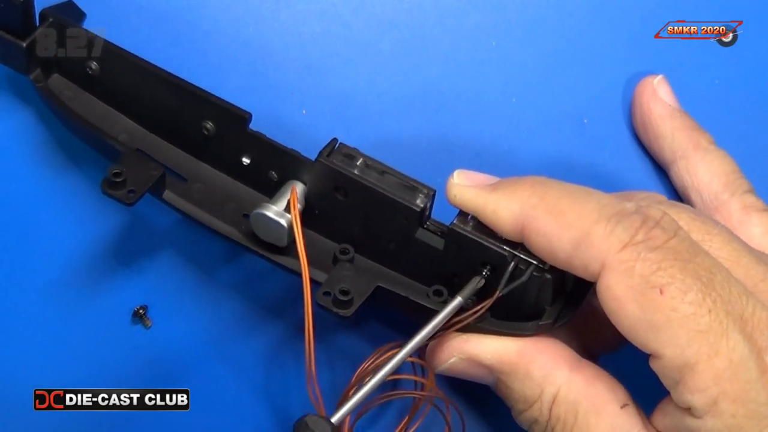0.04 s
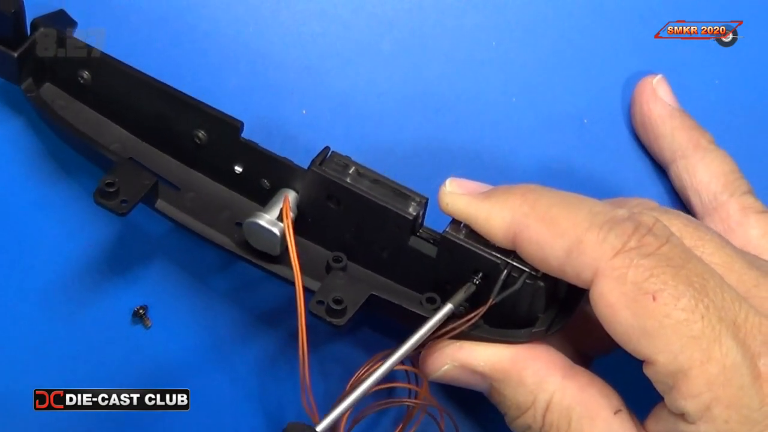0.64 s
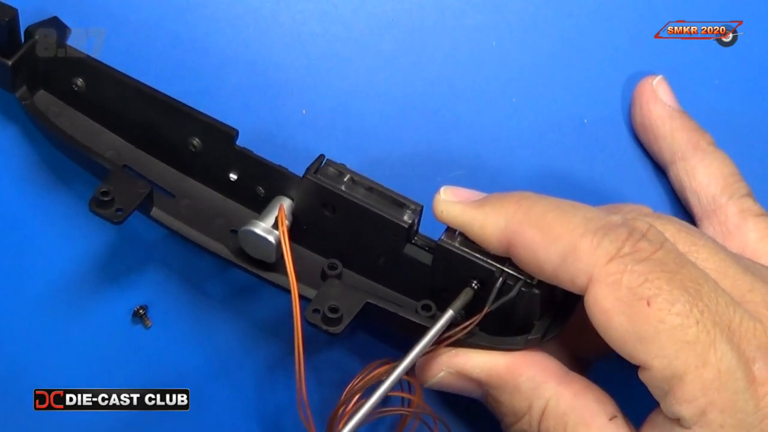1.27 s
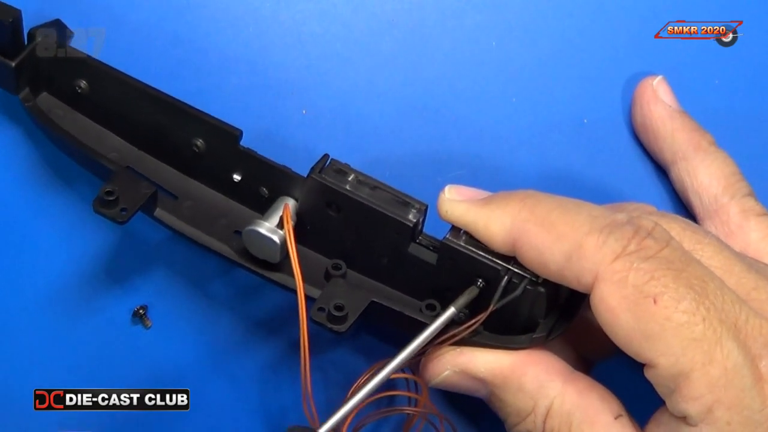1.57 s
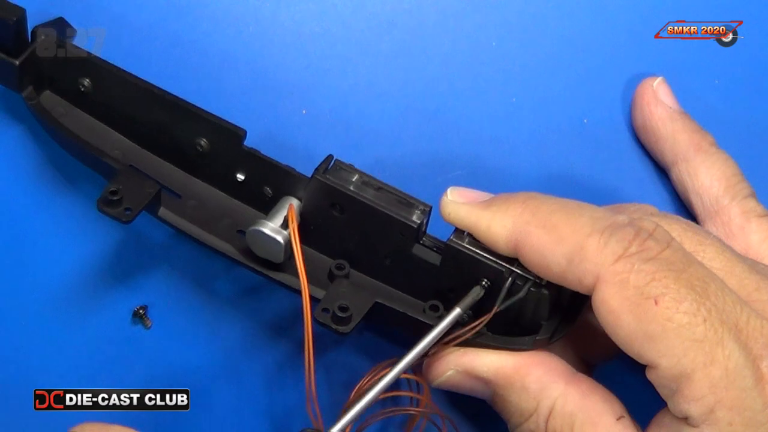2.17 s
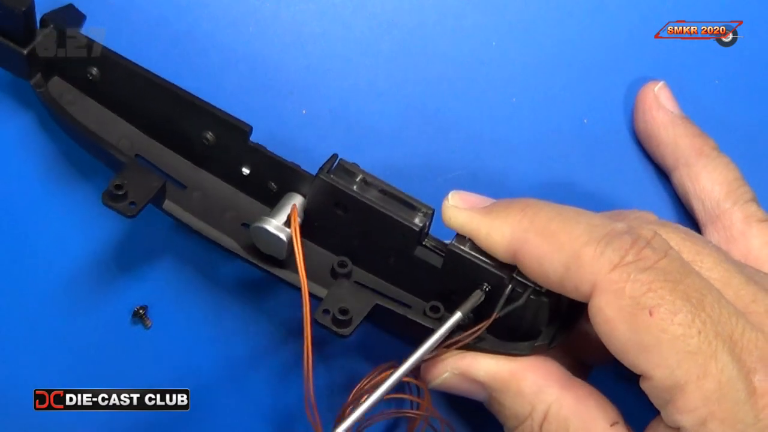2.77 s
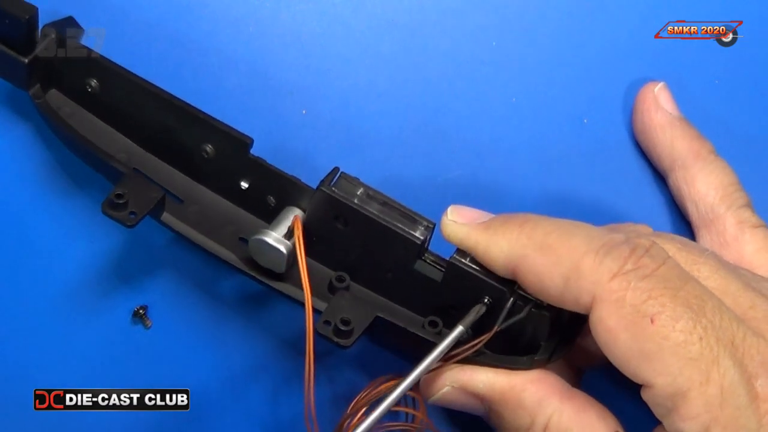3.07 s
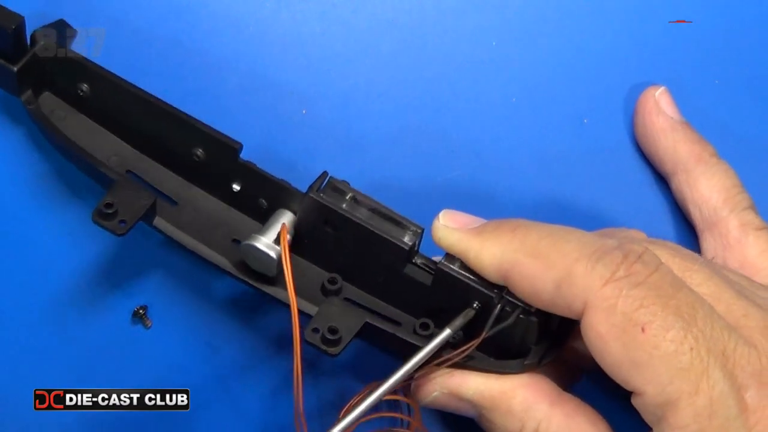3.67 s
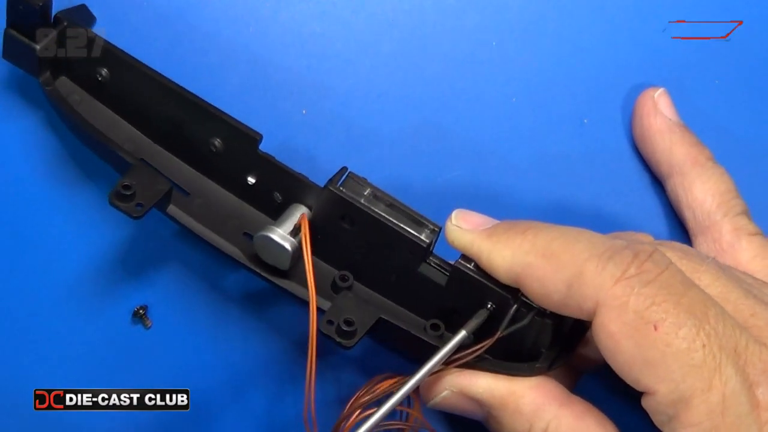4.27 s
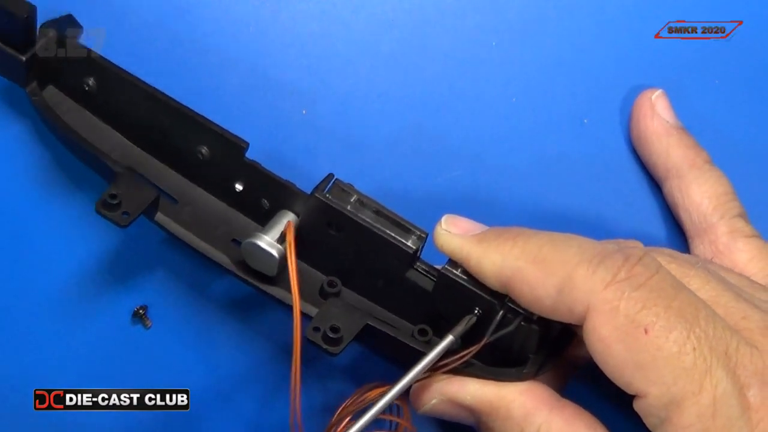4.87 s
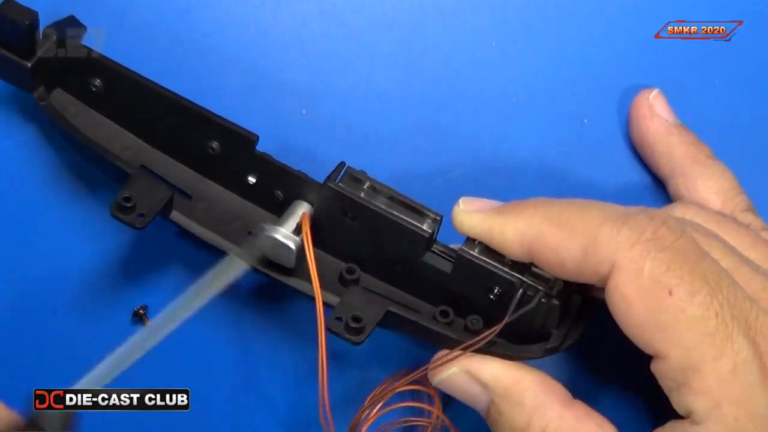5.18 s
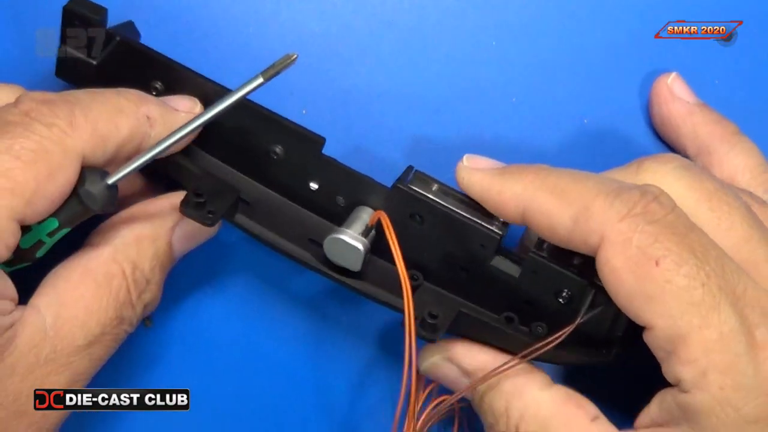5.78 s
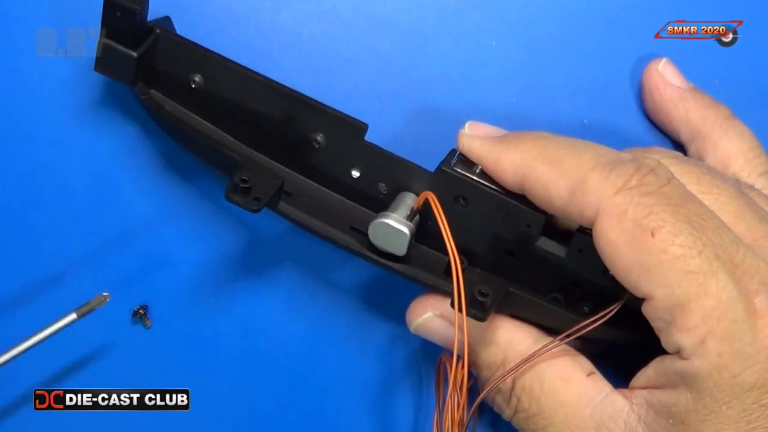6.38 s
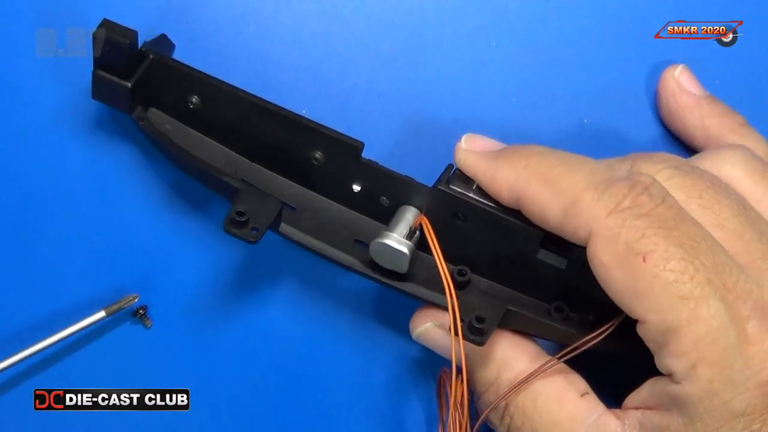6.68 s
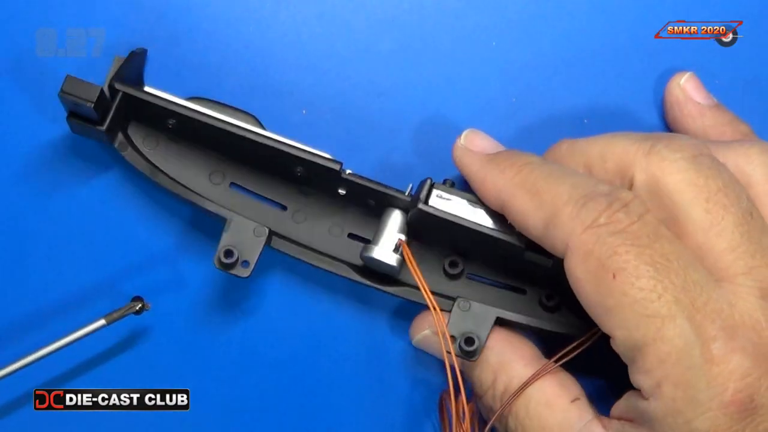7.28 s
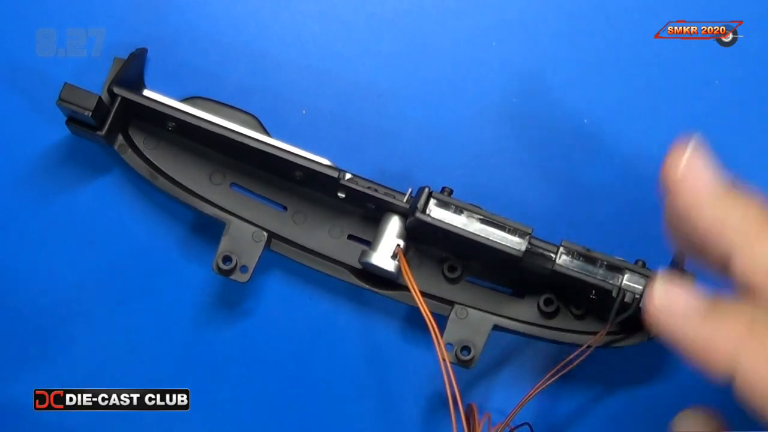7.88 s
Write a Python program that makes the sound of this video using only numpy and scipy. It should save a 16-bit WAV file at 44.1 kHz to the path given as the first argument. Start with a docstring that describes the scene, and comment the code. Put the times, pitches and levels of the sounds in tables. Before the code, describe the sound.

A small screwdriver turns a tiny screw into a hollow plastic part, giving a few sharp, irregular snaps while the part rocks with soft knocks on a bench mat. Fingers then rub over the plastic, another screw clicks faintly onto the magnetic bit, the part is set down and a hand brushes off it. It all sounds close, in a small dry room with faint electronic hiss, whine and buzz.

```python
"""First comes a faint hiss, whine and buzz of electronics in a small dry room. Fingers slide over a
hollow plastic part on a bench mat, and a small screwdriver drives a tiny screw into it. We hear sharp
snaps of the screw thread, knocks as the part rocks, and a brief scuff of fingers on the plastic: each is
a short crack that makes the plastic ring. The next screw jumps to the magnetic bit with a click of
steel, the part is set down, and the hand brushes off it."""
import sys
import numpy as np
from scipy import signal
from scipy.fft import rfft, irfft
from scipy.io import wavfile
from scipy.ndimage import uniform_filter1d

SR = 44100
rng = np.random.default_rng(int(sys.argv[2]) if len(sys.argv) > 2 else 0)


def pcm_store(signal):
    """Save signal as 16-bit PCM."""
    levels = np.round(np.clip(np.atleast_2d(signal), -1, 1) * 32767)
    wavfile.write(sys.argv[1], SR, levels.astype(np.int16).T)


N = 354784
TIME = np.arange(N) / SR

# colour of the steady hiss, that is, how strong it is at each pitch: (pitch [Hz], level [dB])
HISS_COLOUR = [(25, -21), (55, -6.5), (100, -5), (200, -2), (450, 2.5), (700, 3), (1200, 0), (2100, -2),
               (2800, 2.5), (3600, 2), (4800, -3.5), (9000, -3), (13000, -5), (16000, -10)]
# how much of a sound from all round differs between the ears: (pitch [Hz], level [dB])
EAR_DIFFERENCE = [(60, -17), (250, -4), (600, 0), (1200, 3.5), (2500, -1.5), (5000, -3), (9000, -6),
                  (14000, -23.5)]
# mains hum and wavering electronic tones: (pitch [Hz], width [Hz], level [dB])
HUM_AND_TONES = [(121.5, 4.7, -77), (2505, 7.2, -60), (2506, 72.3, -62), (2682, 41, -67), (3030, 33, -81),
                 (4020, 113, -67.5)]
# when a thin electronic tone is on: (start [s], end [s])
THIN_TONE_SPANS = [(0, .1), (.42, .6), (3.68, 3.8), (6.7, 6.87), (7.88, 8)]
# the buzz is made of pips that repeat in four beats:
# (pitch [Hz], width [Hz], offset [s], half length [s], then the level of each beat [dB])
BUZZ_PIPS = [(1460, 70, 0.0599, 0.0035, -59, -58.5, -64.5, -76),
             (2495, 116.6, 0.0564, 0.0031, -58.5, -54, -55.5, -64),
             (9950, 160, 0.0494, 0.0029, -57, -62, -58, -64)]
# the strongest pip: (pitch [Hz], width [Hz], offset [s], half length [s]), and its four beats [dB]
MAIN_PIP, MAIN_BEATS_DB = (3310, 100.4, 0.0571, 0.002), (-52.5, -51, -58.5, -68)
# when its first and third beats grow louder: (start [s], end [s])
SURGE_SPANS = [(3.8, 5.33), (6.65, 8.5)]

# skin slides over the plastic and the bit scrapes in the screw: (middle [s], half length [s], level [dB])
RUB_STROKES = [(.42, .01, -52), (1.265, .013, -53), (1.397, .0054, -53), (1.70, .0037, -48),
               (5.32, 0.073, -53), (5.668, .0058, -47), (5.745, .12, -46.7), (5.94, 0.02, -46),
               (6.058, 0.0091, -37.5), (6.092, 0.004, -39.5), (6.148, .014, -52), (6.695, 0.02, -43)]
# colour of the rubbing: (pitch [Hz], level [dB])
RUBBING_COLOUR = [(150, -14), (400, 0), (1700, -9.5), (3200, 5.5), (5000, 0.5), (8000, 1), (11000, 4),
                  (13000, -1), (16000, -22)]
# sharp snaps of the screw thread, and a brief scuff of fingers on the plastic at 5.667 s:
# (time [s], crack length [s], favoured pitch [Hz], level [dB],
# fall towards the bass [dB per octave], slope of the treble [dB per octave])
SNAPS_AND_SCUFF = [(0.792, 0.0028, 2600, -48, 12, -6), (1.884, 0.0046, 2500, -36.5, 8, -2.5),
                   (2.184, .0025, 3500, -52.5, 15, -2), (2.2858, 0.0032, 2600, -33, 15.5, -3.5),
                   (2.2880, .0018, 2750, -21.5, 20, -5.5), (3.1803, 0.0015, 3600, -46, 14, -3.5),
                   (3.2335, 0.0032, 3700, -48.5, 14, .8), (3.342, .003, 3500, -51, 16, -0.5),
                   (4.1350, 0.0029, 8500, -25, 25.5, 3), (4.8878, 0.0027, 1170, -37.5, 5.5, -1),
                   (4.8897, 0.0027, 3680, -22.5, 14, -0.8), (5.0300, 0.0059, 3700, -47.5, 8, 6),
                   (5.667, .0066, 3700, -50, 3.5, 4), (5.977, 0.0027, 3700, -56, 3.5, 5)]
# colour of a bare crack, before anything rings: (pitch [Hz], level [dB])
CRACK_COLOUR = [(100, -1), (1000, 7), (2000, 4.5), (2900, 0.5), (4300, 5), (6000, 7.5), (9500, 8),
                (12000, 4), (15500, -3.5)]
# the notes at which the plastic part rings: (pitch [Hz], width [Hz], level [dB])
PLASTIC_NOTES = [(169, 43, -10), (285, 13, -3.5), (425, 24, 6), (500, 35, -7), (683, 67, -9),
                 (946, 29, 4.5), (1173, 104, -1), (1530, 390, -6), (2200, 45, -13), (2390, 87, 0.5),
                 (2552, 39, 7.5), (2650, 270, 1.5), (2924, 86, 6.5), (3030, 44, -2), (3427, 75, 0),
                 (3500, 110, 0.5), (3790, 150, -2), (5100, 280, -12), (5560, 150, -12), (8000, 180, -10),
                 (8700, 150, -18), (9130, 160, -16.5), (10060, 83, -7), (11000, 120, -5.5)]
# edges of the five bands of a contact, called thud, body, knock, ring and snap: (pitch [Hz])
BAND_EDGES_HZ = [100, 330, 750, 2000, 3450, 15800]
# the part rocks and knocks on the mat: (time [s], crack length [s], level [dB])
ROCKING_KNOCKS = [(2.2882, 0.0019, -44), (2.7075, 0.0044, -49.5), (2.9865, .0019, -54.5),
                  (3.3575, 0.0072, -43.5), (3.4003, .0046, -48.5), (3.4985, .0043, -60),
                  (3.6595, 0.0071, -56.5), (3.958, .0066, -57.5), (4.8901, .0024, -50.5),
                  (4.9347, .0029, -46), (5.0828, .0026, -44.5), (6.5277, 0.0053, -59)]
# colour of the hardest of these knocks: (pitch [Hz], level [dB])
ROCKING_COLOUR = [(150, -7.5), (500, 0), (1200, 2.5), (2600, 7), (7400, 5)]
# the next screw jumps to the bit: (time [s], crack length [s], favoured pitch [Hz], level [dB],
# fall towards the bass [dB per octave], slope of the treble [dB per octave])
SCREW_CLICK = [(6.8193, .0022, 8400, -52.5, 6, 12.2)]
# the notes at which the screw and steel shaft ring: (pitch [Hz], width [Hz], level [dB])
STEEL_NOTES = [(3270, 140, 7), (5470, 340, 3), (8460, 120, 13.5), (10050, 230, 10), (11900, 330, 13),
               (13600, 1500, 5)]
# the part lands on the mat and settles: (time [s], crack length [s], level [dB])
LANDING_KNOCKS = [(7.0635, .0015, -36.5), (7.0715, 0.0036, -39), (7.078, .0007, -44)]
# colour of the hardest landing knock: (pitch [Hz], level [dB])
LANDING_COLOUR = [(150, -7), (500, 0), (1200, -7), (2600, -0.5), (7400, 1)]
# the notes at which the bench rings under the mat: (pitch [Hz], width [Hz], level [dB])
BENCH_NOTES = [(130, 21, 7), (207, 33, 3), (288, 32, 10), (378, 39, 11), (501, 40, 17.5), (630, 50, 5),
               (2970, 130, 20), (3800, 110, 8)]
# the hand brushes off the part: (middle [s], half length [s], level [dB])
BRUSH_STROKES = [(7.66, 0.063, -47.5)]
# colour of the brushing: (pitch [Hz], level [dB])
BRUSHING_COLOUR = [(200, -18), (2000, -11), (5000, -8), (8000, -4), (10000, 0), (12500, -6), (16000, -14)]

BAND_CENTRES_HZ = np.sqrt(np.multiply(BAND_EDGES_HZ[:-1], BAND_EDGES_HZ[1:]))


def from_db(db):
    """Turn decibels into a gain, a number to multiply a sound by."""
    return 10 ** (np.asarray(db) / 20)


def unit_power(x):
    """Scale a sound so that its average power is 1."""
    return x / np.sqrt(np.mean(x ** 2) + 1e-20)


def gain_at(colour, hz):
    """Look up a colour's gain at any pitch, gliding between its rows."""
    pitches, db = np.transpose(colour)
    return from_db(np.interp(np.log(hz + 1), np.log(pitches), db))


def coloured(x, colour):
    """Turn each pitch of a sound up or down to give it a colour."""
    return irfft(rfft(x) * gain_at(colour, np.fft.rfftfreq(len(x), 1 / SR)), len(x))


def hiss(colour, size):
    """Stereo noise arriving from all round; the ears hear the bass and the top most alike."""
    shared, side = (coloured(noise, colour) for noise in rng.standard_normal((2, size)))
    return (shared + coloured(side, EAR_DIFFERENCE) * np.array([[1], [-1]])) / np.std(shared)


def wavering_tone(hz, width_hz):
    """A pure tone whose pitch wanders at random over about the given width."""
    memory = np.exp(-2 * np.pi * width_hz / SR)
    wander = unit_power(signal.lfilter([1], [1, -memory], rng.standard_normal(N)))
    return np.sqrt(2) * np.sin(2 * np.pi * np.cumsum(hz + wander * width_hz / 2) / SR)


def switched(spans):
    """A soft on-off switch: 1 during the spans and 0 outside."""
    return uniform_filter1d(sum(1. * (TIME > start) * (TIME < end) for start, end in spans), size=600)


def whine(line_rate_hz=15734.3, throb_hz=11.7, throb_depth=0.19):
    """The electronics hum and give off thin tones; a screen circuit whistles at its line rate."""
    throb = 1 + throb_depth * np.sin(2 * np.pi * throb_hz * TIME)
    whistle = from_db(-59) * throb * wavering_tone(line_rate_hz, width_hz=1)
    thin_tone = from_db(-65) * switched(THIN_TONE_SPANS) * wavering_tone(hz=8080, width_hz=2.6)
    tones = sum(from_db(db) * wavering_tone(hz, width_hz) for hz, width_hz, db in HUM_AND_TONES)
    return whistle + thin_tone + tones


def pips(hz, width_hz, offset_s, half_s, *beats_db, cycle_hz=14.985):
    """Short pips of one pitch in a repeating pattern of louder and softer beats."""
    beats_per_s = cycle_hz * len(beats_db)
    beat = (TIME - offset_s) * beats_per_s
    nearest = np.round(beat).astype(int)
    accent = from_db(np.choose(nearest % len(beats_db), beats_db))
    from_beat_s = (beat - nearest) / beats_per_s
    return accent * np.exp(-(from_beat_s / half_s) ** 2 / 2) * wavering_tone(hz, width_hz)


def buzz(surge_db=7):
    """Electronic interference: pips at several pitches, all locked to one cycle."""
    boost_db = surge_db * switched(SURGE_SPANS)
    beats_db = [db + boost_db * (beat % 2 == 0) for beat, db in enumerate(MAIN_BEATS_DB)]
    return pips(*MAIN_PIP, *beats_db) + sum(pips(*row) for row in BUZZ_PIPS)


def sliding(strokes, colour, grain_db):
    """Friction makes a grainy hiss that swells and fades with each stroke."""
    pressure = sum(from_db(db) * np.exp(-np.abs((TIME - middle_s) / half_s) ** 1.87 / 3)
                   for middle_s, half_s, db in strokes)
    fine, coarse = (unit_power(uniform_filter1d(rng.standard_normal(N), size)) for size in (40, 400))
    grain = unit_power(from_db(grain_db * (fine + coarse / 2)))
    return pressure * grain * hiss(colour, N)


def crack(t, length_s, rise_s=0.00083):
    """A brief burst of tiny slips, evened out over all pitches and then coloured."""
    burst = rng.standard_normal(len(t)) * (1 - np.exp(-t / rise_s)) * np.exp(-(t / length_s) ** 2)
    for _ in range(3):
        even = irfft(np.exp(1j * np.angle(rfft(burst))), len(t))  # every pitch equally strong
        burst = even * np.exp(-(t / length_s / 2) ** 4)  # make it short again
    return coloured(burst, CRACK_COLOUR) * (t < t[-1] / 2)


def ring(x, hz, width_hz):
    """One note of a struck object: the narrower its width, the longer it rings."""
    decay = np.exp(-np.pi * width_hz / SR)
    feed = np.array([1, 0, -1]) * (1 - decay * decay) / 2
    feedback = [1, -2 * decay * np.cos(2 * np.pi * hz / SR), decay * decay]
    return signal.lfilter(feed, feedback, x + 1e-18)


def room_response(t, fade_s=0.13, echo_db=-4, build_up_s=0.00037, left_lag=0.26):
    """The direct sound, a little earlier on the right, then dense echoes from the bench and walls."""
    echoes = hiss([(100, 2.5), (9000, -2.5), (15000, -4.5)], len(t))
    echoes *= from_db(-60 * t / fade_s) * (1 - np.exp(-t / build_up_s))
    response = from_db(echo_db) * echoes / np.sqrt(np.sum(echoes ** 2) / 2)
    response[:, :3] += [[1 - left_lag / 2, left_lag, -left_lag / 2], [1, 0, 0]]
    return response


def strikes(contacts, notes, bare_db, favour_db=4.5, favour_octaves=0.27):
    """Each contact is a crack that is heard bare and also makes the object's notes ring."""
    t, out = np.arange(SR // 4) / SR, np.zeros((2, N))
    bands = [signal.butter(4, edges, "band", fs=SR, output="sos")
             for edges in zip(BAND_EDGES_HZ, BAND_EDGES_HZ[1:])]
    for time_s, length_s, favoured_hz, *levels_db in contacts:
        bare = crack(t, length_s)
        # the point of contact favours some notes
        nearness = np.exp(-(np.log2(np.array(notes)[:, 0] / favoured_hz) / favour_octaves) ** 2)
        strengths = from_db(favour_db * nearness + 2 * rng.standard_normal(len(notes)))
        ringing = sum(strength * from_db(db) * ring(bare, hz, width_hz)
                      for strength, (hz, width_hz, db) in zip(strengths, notes))
        room = room_response(t)  # every contact sends sound its own way, so its echoes differ
        heard = signal.fftconvolve((from_db(bare_db) * bare + ringing)[None], room, axes=1)[:, :len(t)]
        start = round(time_s * SR)
        for band, db in zip(bands, levels_db):
            in_band = signal.sosfilt(band, heard)
            power = np.sum(in_band.mean(0) ** 2) / (.035 * SR)  # as if spread over 35 ms
            out[:, start:start + len(t)] += from_db(db) * in_band / np.sqrt(power)
    return out


def bright_contacts(rows, notes, bare_db, ring_hz=2676):
    """A snap, scuff or click: each has its own bass and treble slopes, which meet at ring_hz."""
    octaves = np.log2(BAND_CENTRES_HZ / ring_hz)
    contacts = []
    for time_s, length_s, favoured_hz, db, bass_fall, treble_slope in rows:
        levels_db = db + np.where(octaves < 0, bass_fall, treble_slope) * octaves
        contacts.append((time_s, length_s, favoured_hz, *levels_db))
    return strikes(contacts, notes, bare_db)


def knocks(rows, colour, notes, bare_db, dulling, body_hz=433):
    """The part hits the mat; for each dB softer, a knock loses `dulling` dB per octave of treble."""
    hardest_db = max(db for _, _, db in rows)
    colour_db = 20 * np.log10(gain_at(colour, BAND_CENTRES_HZ))
    octaves = np.maximum(np.log2(BAND_CENTRES_HZ / body_hz), 0)
    contacts = []
    for time_s, length_s, db in rows:
        levels_db = db + colour_db - dulling * (hardest_db - db) * octaves
        contacts.append((time_s, length_s, body_hz, *levels_db))
    return strikes(contacts, notes, bare_db)


def scene():
    """The work on the bench over the faint electronics, both slightly to the right."""
    snaps_and_scuff = bright_contacts(SNAPS_AND_SCUFF, PLASTIC_NOTES, bare_db=-6.5)
    rocking = knocks(ROCKING_KNOCKS, ROCKING_COLOUR, PLASTIC_NOTES, bare_db=-10.5, dulling=0.19)
    landing = knocks(LANDING_KNOCKS, LANDING_COLOUR, PLASTIC_NOTES + BENCH_NOTES,
                     bare_db=-3.5, dulling=0.71)
    next_screw = bright_contacts(SCREW_CLICK, STEEL_NOTES, bare_db=-5)
    rubbing = sliding(RUB_STROKES, RUBBING_COLOUR, grain_db=2.0)
    brushing = sliding(BRUSH_STROKES, BRUSHING_COLOUR, grain_db=1.0)
    electronics = from_db(-51.5) * hiss(HISS_COLOUR, N) + whine() + buzz()
    work = rubbing + snaps_and_scuff + rocking + next_screw + landing + brushing
    return electronics * from_db([[-.6], [.6]]) + work * from_db([[-.4], [.4]])


def record(dry, cutoff_hz=16000):
    """Round off the loudest peaks and cut the very highest treble."""
    rounded = dry / (1 + dry ** 6) ** (1 / 6)
    return signal.sosfilt(signal.ellip(12, .1, 100, cutoff_hz, fs=SR, output="sos"), rounded)


dry = scene()
out = record(dry)
pcm_store(out)
```